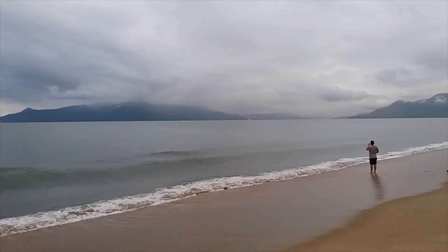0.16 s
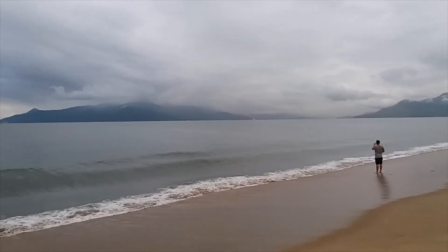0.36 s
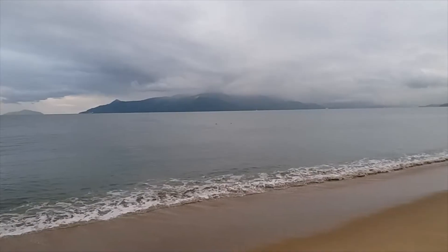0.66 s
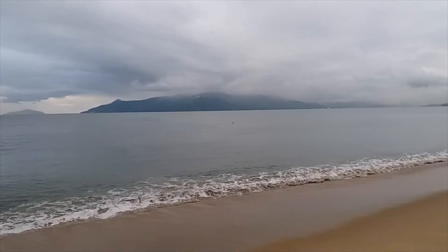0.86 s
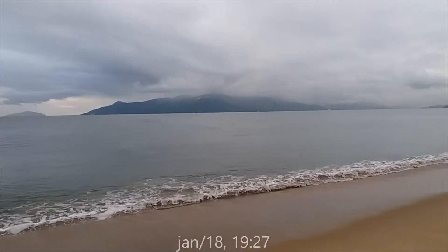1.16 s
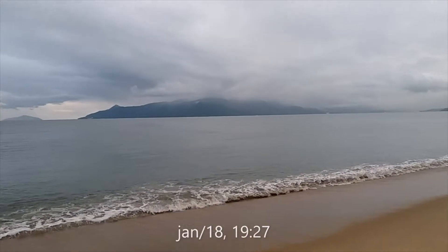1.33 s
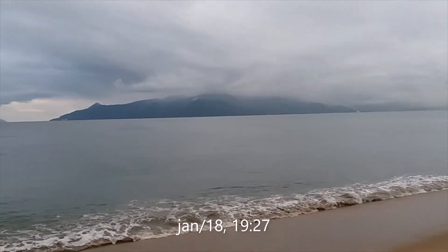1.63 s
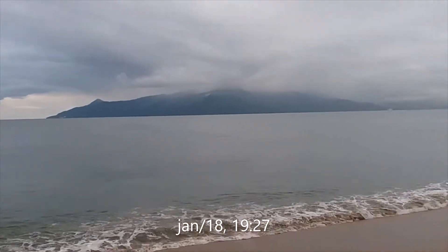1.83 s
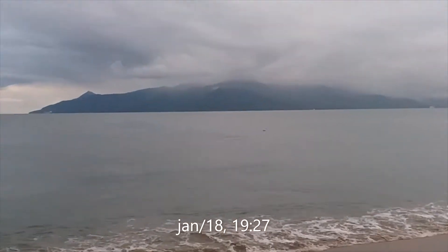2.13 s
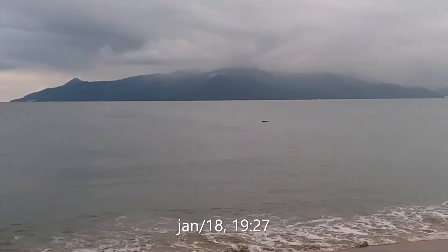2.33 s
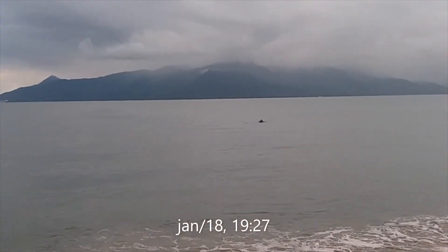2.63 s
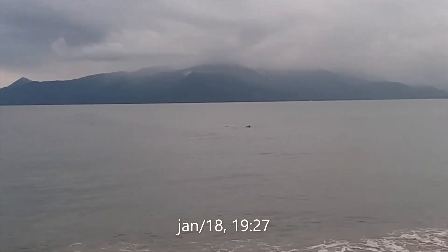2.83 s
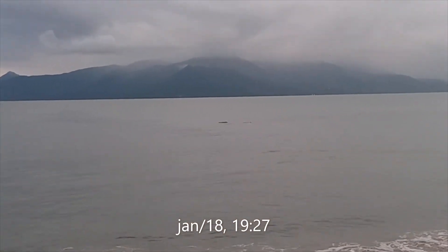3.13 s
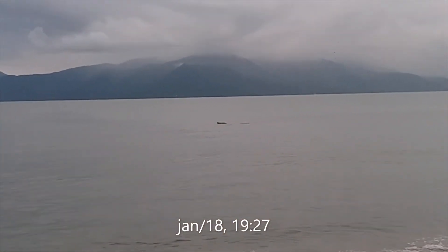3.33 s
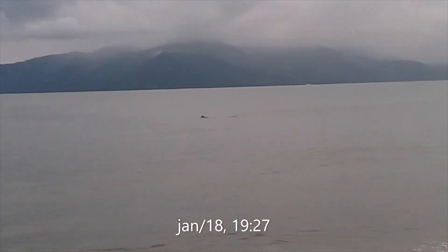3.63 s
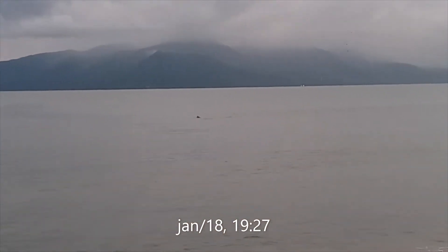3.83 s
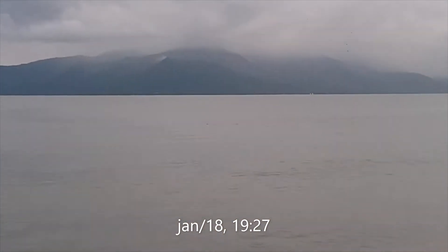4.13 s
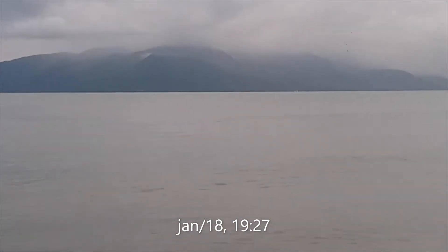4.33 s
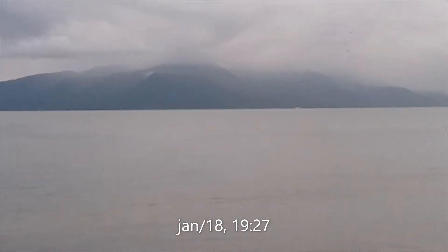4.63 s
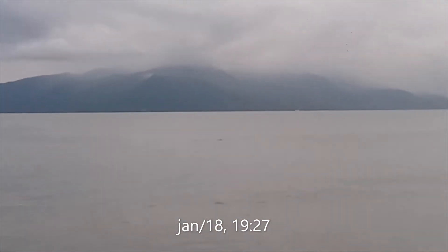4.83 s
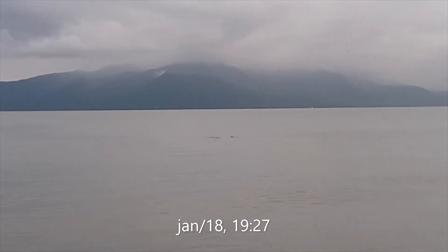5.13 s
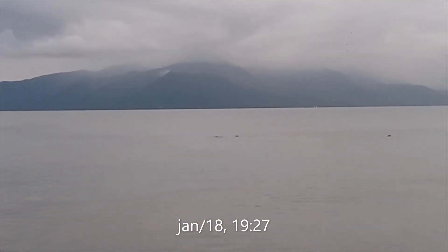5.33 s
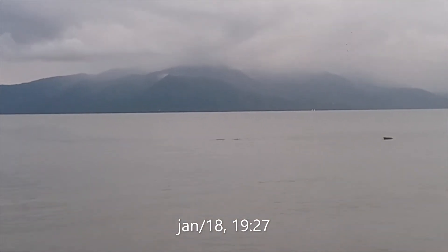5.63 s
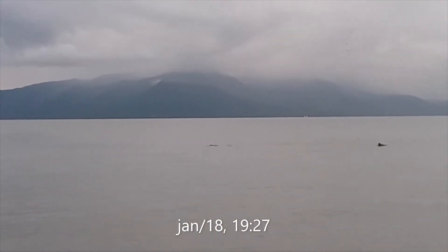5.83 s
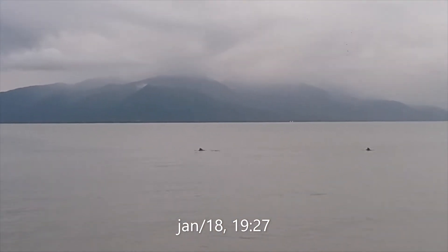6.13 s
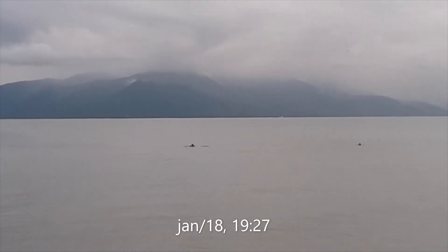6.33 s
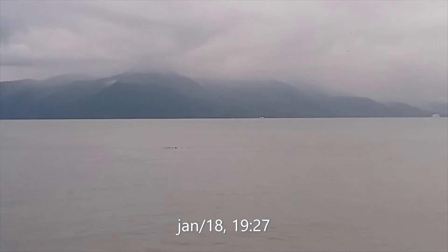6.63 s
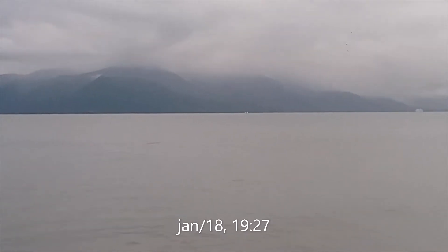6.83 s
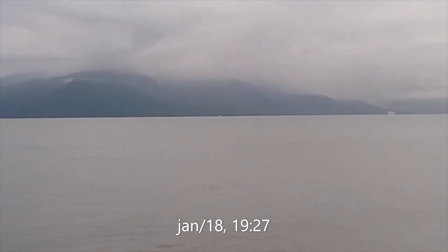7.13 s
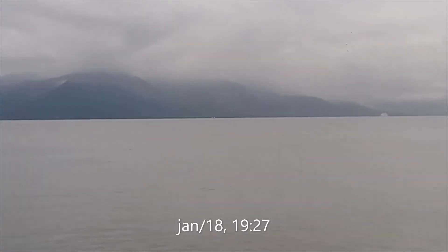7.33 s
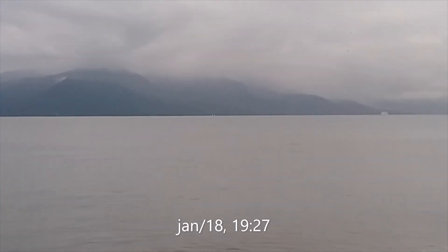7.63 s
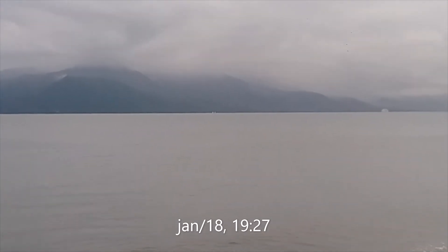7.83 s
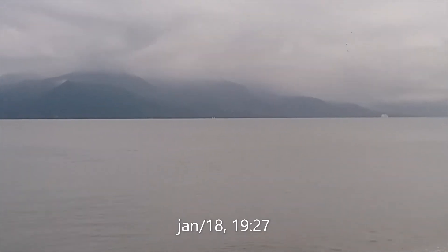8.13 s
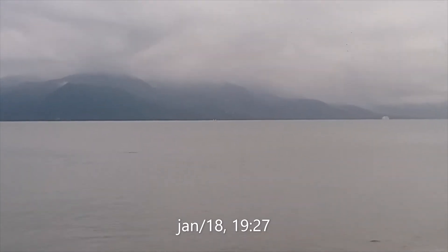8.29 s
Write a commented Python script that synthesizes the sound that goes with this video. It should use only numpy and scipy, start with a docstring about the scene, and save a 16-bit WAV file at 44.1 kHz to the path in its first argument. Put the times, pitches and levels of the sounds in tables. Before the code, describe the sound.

A hydrophone in shallow coastal water picks up dolphins echolocating: short woody, resonant clicks, first in close pairs and dull runs, then in brighter trains that quicken and slacken. More distant animals blur into a pitched crackle. A steady mid-high hiss lies underneath, with low flowing rumble and sloshing surges, scattered sharp shrimp snaps, a few bubbles, soft thuds, and a heavy double knock late on.

```python
"""Dolphins echolocate in shallow coastal water, heard through a hydrophone.
Their clicks are resonant pulses: pairs, a bright train that quickens and slackens, dull runs farther off and
a distant crackle. Shrimp snaps are broader pulses; two short buzzes, apart from the dolphins, are fast pulses.
Bubbles, knocks with their upper body and a faint tone in a buzz are damped rings.
Filtered noise makes the water's flow, rumble, sloshing and nearly steady hiss; a faint whine is two sines."""
import sys
import numpy as np
from scipy import signal
from scipy.fft import rfft, irfft, next_fast_len
from scipy.io import wavfile
from scipy.ndimage import uniform_filter1d

SR = 44100
rng = np.random.default_rng(int(sys.argv[2]) if len(sys.argv) > 2 else 0)


def inscribe(sig):
    """Save sig as 16-bit PCM at rate SR to the path in sys.argv[1].

    A 1-D sig is mono; a 2-D sig holds one channel per row.
    Samples are clipped to [-1, 1] before scaling.
    """
    pcm = np.round(np.clip(np.atleast_2d(sig).T, -1, 1) * 32767)
    wavfile.write(sys.argv[1], SR, pcm.astype(np.int16))


N = 373086
TIME = np.arange(N) / SR  # s

# colour of sloshing water and of the splash at a knock: freq_hz, density_db (relative, per Hz)
SLOSH_COLOUR = [(150, -11), (300, -3.5), (430, -0.5), (650, 3), (1000, -3), (1400, -5), (2500, -17)]


def from_db(db):
    """Decibels to amplitude gain."""
    return 10 ** (np.asarray(db) / 20)


def rms_one(x):
    """Scale to rms 1."""
    return x / np.sqrt(np.mean(x ** 2) + 1e-20)


def gain_at(colour, hz):
    """Gain of a colour, interpolated in dB over log frequency; it falls away beyond both ends."""
    points_hz, level_db = np.transpose(colour)
    hz = np.maximum(hz, 1)
    low_end = np.minimum(hz / points_hz[0], 1)
    high_end = np.minimum(points_hz[-1] / hz, 1) ** 2
    return low_end * high_end * from_db(np.interp(np.log(hz), np.log(points_hz), level_db))


def coloured_noise(colour):
    """White noise shaped by a colour; rms 1."""
    size = next_fast_len(N)
    spectrum = rfft(rng.standard_normal(N), size)
    return rms_one(irfft(spectrum * gain_at(colour, np.fft.rfftfreq(size, 1 / SR)), size)[:N])


def drift(rate_hz):
    """Random values joined by straight lines, rate_hz of them per second; rms 1."""
    steps = rng.standard_normal(4000)
    return rms_one(np.interp(TIME * rate_hz, np.arange(len(steps)), steps))


def add(out, start, sound):
    """Mix a sound in at a sample position."""
    first, last = max(start, 0), min(start + len(sound), N)
    if last > first:
        out[first:last] += sound[first - start:last - start]


def pulse(colour, stretch, lag_s, size):
    """Spectrum of a unit-energy click; its resonances lag the weakest frequencies by up to lag_s."""
    hz = np.fft.rfftfreq(size, 1 / SR)
    gain = gain_at(colour, hz * stretch)
    delay_s = lag_s * (np.sqrt(gain / gain.max()) - 1)
    phase = -2 * np.pi * np.cumsum(delay_s) * hz[1]  # group delay integrated over frequency
    return gain * np.exp(1j * phase) / np.linalg.norm(irfft(gain))


def clicks(rows, colour, vary, lag_s, echo_s, size=1024):
    """Pulses of random pitch and phase, each with three weak inverted echoes from surface and bed."""
    echo_db = -16
    out, hz = np.zeros(N), np.fft.rfftfreq(size, 1 / SR)
    treble = np.interp(hz, [1900, 2400], [0, 1])
    draws = rng.uniform(-0.99, 1, (len(rows), 5))  # pitch, phase, three echo delays
    for (start_s, level_db, *treble_db), draw in zip(rows, draws):
        direct = pulse(colour, np.exp(vary * draw[0]), lag_s, size)
        direct = direct * from_db(level_db + sum(treble_db) * treble)
        delays_s = echo_s * np.exp(draw[2:])
        echoes = np.exp(-2j * np.pi * np.outer(delays_s, hz)).sum(axis=0)
        paths = 1 - from_db(echo_db) * echoes
        click = np.fft.fftshift(irfft(direct * paths * np.exp(1j * np.pi * draw[1])))
        add(out, round(start_s * SR) - size // 2, click * signal.windows.tukey(size))
    return out


def rings(rows, glide):
    """Damped oscillations that swell and die away; pitch slides by a share per swell time, up to ten."""
    out, t = np.zeros(N), TIME[:SR // 4]
    for start_s, peak_db, pitch_hz, swell_s in rows:
        age = t / swell_s
        phase = 2 * np.pi * np.cumsum(pitch_hz * (1 + glide * np.minimum(age, 10))) / SR
        envelope = age ** 2 * np.exp(2 * (1 - age))  # peaks at 1 after swell_s
        add(out, round(start_s * SR), from_db(peak_db) * envelope * np.sin(phase))
    return out


def water():
    """Lumpy flow, rumble and sloshing noises follow the sea and its surges; the hiss only flickers."""
    # slow levels before offsets, surges and lumps: time_s, flow_db, rumble_db, slosh_db
    sea = [(0.0, -52, -39, -38), (0.16, -63.5, -53.5, -50), (1.27, -59, -54, -52.5),
           (1.43, -64, -58, -55.5), (2.02, -58, -50.5, -53.5), (2.19, -56.5, -50, -51),
           (2.47, -70, -54.5, -54), (2.94, -71, -47.5, -57), (3.46, -62, -51.5, -49),
           (4.41, -63.5, -48.5, -55), (5.2, -60, -54.5, -57.5), (6.1, -69, -54, -54), (6.69, -64, -53, -57),
           (6.9, -60, -45, -52.5), (7.61, -69, -53.5, -57), (8.32, -53, -41.5, -49.5),
           (8.46, -54, -36, -46.5)]
    # surges past the hydrophone: crest_s, half_width_s (to 1/e of the lift), lift_db (full on the flow)
    surges = [(.06, .04, 2.5), (.39, 0.063, 5.5), (1.14, 0.062, 13.5), (1.35, 0.022, 5), (1.66, 0.11, 3.5),
              (2.31, 0.045, 5.5), (6.88, 0.086, 0), (7.93, 0.099, 6.5), (8.43, 0.08, 4.5)]
    # noise colours: freq_hz, density_db (relative, per Hz)
    flow_colour = [(20, -25), (45, -14.5), (70, -3.5), (105, -4.5), (135, -2), (200, -29)]
    rumble_colour = [(80, -19.5), (120, -4), (165, 0), (230, -8.5), (350, -21.5), (700, -59.5)]
    hiss_colour = [(900, -23.5), (1350, -10), (1700, 4.5), (2100, 5), (2600, 2.5), (3100, -5),
                   (3800, -15.5), (5000, -26.5), (6800, -27), (7800, -37.5), (9500, -39.5), (11200, -41),
                   (13000, -29), (16000, -31.5)]
    rumble_share, slosh_share = 0.81, 0.78  # of a surge's lift in dB
    flow_lumps_db, rumble_lumps_db, slosh_lumps_db = 3, 2.8, 3.7  # rms
    hiss_db, hiss_flicker_db = -47.5, 1.6

    time_s, *columns = np.transpose(sea)
    flow_db, rumble_db, slosh_db = [np.interp(TIME, time_s, column) for column in columns]
    surge_db = sum(lift_db * np.exp(-((TIME - crest_s) / half_width_s) ** 2)
                   for crest_s, half_width_s, lift_db in surges)
    flow_gain = from_db(flow_db + surge_db + 7.5 + flow_lumps_db * drift(17))
    rumble_gain = from_db(rumble_db + rumble_share * surge_db + 0.8 + rumble_lumps_db * drift(16))
    slosh_gain = from_db(slosh_db + slosh_share * surge_db - 2.0 + slosh_lumps_db * drift(90))
    hiss_gain = from_db(hiss_db + hiss_flicker_db * drift(120))

    flow = flow_gain * coloured_noise(flow_colour)
    rumble = rumble_gain * coloured_noise(rumble_colour)
    slosh = slosh_gain * coloured_noise(SLOSH_COLOUR)
    hiss = hiss_gain * coloured_noise(hiss_colour)
    return flow + rumble + slosh + hiss


def whine():
    """Faint electrical whine: steady sines."""
    # sines: pitch_hz, rms_db
    tones = [(7295, -97.5), (14590, -97.5)]
    return sum(from_db(rms_db) * np.sqrt(2) * np.sin(2 * np.pi * pitch_hz * TIME)
               for pitch_hz, rms_db in tones)


def pod_swell():
    """Rise and fall of the farther pod as it moves, in dB around its mean."""
    # pod level, only its shape is used: time_s, level_db
    pod_levels = [(0.0, -39), (1.08, -39.5), (1.43, -40.5), (4.03, -38.5), (5.02, -43.5), (6.17, -38),
                  (6.93, -44), (7.37, -41.5), (8.46, -41.5)]
    level_db = np.interp(TIME, *np.transpose(pod_levels))
    return level_db - level_db.mean()


def far_pod(level_db, per_s, spread_db, width_s, size=512):
    """Distance smears clicks into short pitched blips; several animals merge into a crackle."""
    # voices of the distant animals: pitch_hz, level_db (relative)
    voices = [(1660, -5.5), (1740, 2), (1830, 1.5), (1970, 2.5), (2250, -2), (2420, 1), (2560, -9),
              (2720, -12.5), (2950, -3.5)]
    out, t = 0, (np.arange(size) - size // 2) / SR
    sizes = from_db(-spread_db * rng.random(N))
    signs = rng.choice([-1, 1], N)
    struck = rng.random(N) < per_s / SR
    impulses = sizes * signs * struck
    caller = rng.integers(0, len(voices), N)
    for k, (pitch_hz, voice_db) in enumerate(voices):
        blip = from_db(voice_db) * np.cos(2 * np.pi * pitch_hz * t) / np.cosh(t / width_s)
        out = out + signal.fftconvolve(impulses * (caller == k), blip, "same")
    return from_db(level_db + pod_swell()) * rms_one(out)


def pod_trains(level_db, count):
    """Animals click without pause at wandering pace; level swings as heads turn: rows start_s, level_db."""
    gap_s, wander, swing_db = .065, .2, 1.6  # usual gap, spread of the log rate, rms swing
    rows = []
    for _ in range(count):
        rate_per_s = np.exp(wander * drift(1.5)) / gap_s
        sent = rng.random() + np.cumsum(rate_per_s) / SR
        at = np.flatnonzero(np.diff(np.floor(sent)))  # a click at each whole count
        levels_db = level_db + pod_swell() + swing_db * drift(3.045)
        rows += zip(TIME[at], levels_db[at])
    return rows


def train(runs):
    """Within a run the click gap changes evenly; levels vary by 1 dB rms: rows start_s, level_db."""
    rows = []
    for first_s, last_s, count, gap_ratio, level_db in runs:
        steps = np.cumsum([0, *np.linspace(1, gap_ratio, round(count) - 1)])
        starts_s = first_s + (last_s - first_s) * steps / steps[-1]
        rows += [(start_s, level_db) for start_s in starts_s]
    chances_db = rng.standard_normal(len(rows))
    return [(start_s, level_db + chance_db) for (start_s, level_db), chance_db in zip(rows, chances_db)]


def dolphins():
    """Resonant click pairs, and bright and dull trains, with weaker trains behind them."""
    # All level_db here are relative, before each kind's gain below.
    # pairs of the nearest dolphin, mostly duller when it turns away: start_s, gap_s, level_db, treble_db
    pair_rows = [(.6111, .034, -20, -2.5), (.7982, .0322, -20, -1.5), (.9714, .0323, -21, -1),
                 (1.1551, .034, -21, -2), (1.719, .0335, -28.5, -7), (1.885, .0335, -28.5, -8),
                 (2.0459, .0358, -30, -7), (2.2285, .0306, -27, -7), (3.1751, .0335, -22.5, 2),
                 (3.3576, .032, -23, 1.5), (3.5308, .0317, -22, 1), (3.7252, .0318, -22, .5),
                 (3.9541, .0313, -28, -10), (4.6359, .0327, -30, -7), (4.7977, .0317, -27.5, -7),
                 (4.9575, .0313, -27, -5), (5.1168, .0303, -27.5, -7), (5.2845, .0313, -28, -7),
                 (5.4768, .0327, -28, -7), (5.735, .0314, -28, -4)]
    # runs with the beam at the hydrophone: first_s, last_s, clicks, last_gap/first_gap, level_db
    bright_runs = [(.7901, 1.2297, 4, 1.03, -29), (2.612, 2.8769, 3, .87, -26.5),
                   (2.9883, 3.3455, 5, .77, -28.5), (3.4205, 3.737, 6, .87, -27.5),
                   (3.8069, 4.2395, 9, .81, -27), (4.2914, 4.7278, 10, 1.02, -29.5),
                   (4.7787, 5.0526, 5, 1.44, -29.5), (5.1346, 5.5153, 6, .82, -29.5),
                   (5.5846, 6.0318, 8, .91, -26.5), (6.0943, 6.3337, 5, .8, -26),
                   (6.3858, 6.5525, 4, 1.16, -25.5), (6.6252, 7.2362, 10, .76, -26),
                   (7.3006, 7.83, 10, .79, -26), (7.8871, 8.417, 11, .97, -26.5)]
    # runs of dolphins facing away: first_s, last_s, clicks, last_gap/first_gap, level_db
    dull_runs = [(.0694, .3417, 4, .88, -24), (.4211, .6297, 4, .87, -26), (.6912, .9603, 6, .87, -26),
                 (1.1629, 1.4803, 5, 0.77, -27.5), (1.5419, 1.8655, 7, 0.84, -25.5),
                 (1.9591, 2.0724, 3, .78, -26.5), (2.1829, 2.3344, 4, 1.01, -29.5),
                 (2.4631, 2.577, 3, 1.27, -29), (2.6351, 2.9171, 5, 0.91, -30),
                 (2.9929, 3.3167, 6, 0.94, -32), (3.6836, 3.8385, 3, .82, -27.5),
                 (4.1493, 4.2779, 3, 1.23, -30.5), (4.6089, 4.8448, 3, .77, -29),
                 (4.9414, 5.2509, 4, 0.92, -28.5), (5.346, 5.7061, 5, .72, -28),
                 (5.783, 5.9852, 4, 0.84, -27), (6.0439, 6.3104, 6, 0.91, -26.5),
                 (6.7552, 6.965, 3, 0.82, -25.5), (7.058, 7.233, 3, 1.06, -24.5),
                 (7.3161, 7.6593, 6, 0.83, -29), (7.718, 8.023, 7, .88, -33)]
    # click colours: freq_hz, level_db
    paired_colour = [(120, -28.5), (330, -14), (750, -7), (1200, -16), (1700, 4.5), (1900, -2),
                     (2180, -12.5), (2650, 4.5), (2950, 0.5), (3350, -23.5), (5000, -31.5), (7500, -55.5)]
    bright_colour = [(300, -15.5), (1200, -48), (1700, 7), (2000, -23.5), (2300, 10), (2550, 8),
                     (3000, -13), (3700, -18.5), (4500, -26), (6600, -27), (7400, -54.5)]
    dull_colour = [(300, -35.5), (800, -25), (1250, -31.5), (1600, -5), (1780, 3), (2150, -11.5),
                   (2450, -9.5), (2850, -26.5), (3400, -21), (4500, -67.5), (6500, -97.5), (7500, -79.5)]
    pod_dull_db, pod_bright_db, pod_low_db = -33, -38, -39  # weaker trains

    pairs = [(start_s + late_s, level_db, treble_db)
             for start_s, gap_s, level_db, treble_db in pair_rows for late_s in (0, gap_s)]
    low = pairs + pod_trains(pod_low_db, count=1)
    paired = from_db(19.5) * clicks(low, paired_colour, vary=0.012, lag_s=0.001755, echo_s=0.000808)

    facing = train(bright_runs) + pod_trains(pod_bright_db, count=2)
    bright = from_db(17.3) * clicks(facing, bright_colour, vary=0.025, lag_s=0.0018, echo_s=0.0007)

    turned = train(dull_runs) + pod_trains(pod_dull_db, count=2)
    dull = from_db(16.8) * clicks(turned, dull_colour, vary=0.04, lag_s=0.0018, echo_s=0.0009)
    return paired + bright + dull


def knocks():
    """Low thuds at the hydrophone, each with an overtone and a little splash; deep bass is cut."""
    # fundamentals before the bass cut: start_s, peak_db, pitch_hz, swell_s
    thud_rows = [(.024, -28, 140, 0.017), (1.106, -27, 157, 0.0039), (1.189, -36, 151, 0.0052),
                 (1.627, -31, 131, 0.01), (1.916, -29, 132, 0.0035), (2.279, -31, 110, 0.011),
                 (2.333, -28.5, 97.5, 0.0057), (4.27, -30, 153, 0.023), (5.459, -28.5, 149, 0.0048),
                 (6.095, -32.5, 158, 0.0081), (6.322, -32, 120, 0.0057), (6.743, -30.5, 135, 0.019),
                 (6.795, -9, 112, 0.0034), (6.808, -18, 160, 0.0038), (6.8193, -5.5, 157, 0.0049),
                 (6.834, -15.5, 125, 0.0077), (8.419, -17, 153, 0.0031), (8.45, -17.5, 191, 0.0046)]
    pitch_ratio, overtone_db, swell_ratio = 2.3, -20, 0.88  # overtone against fundamental
    overtones = [(start_s, peak_db + overtone_db, pitch_hz * pitch_ratio, swell_s * swell_ratio)
                 for start_s, peak_db, pitch_hz, swell_s in thud_rows]
    bass_cut = signal.butter(3, 72, "high", fs=SR, output="sos")
    thuds = signal.sosfilt(bass_cut, rings([*thud_rows, *overtones], glide=-0.018))
    stir = uniform_filter1d(np.abs(thuds), size=SR // 50)  # 20 ms mean
    return thuds + from_db(-29.0) * stir * coloured_noise(SLOSH_COLOUR)


def short_rings():
    """Damped rings, pitch rising slightly: bubbles, upper body of the big knock, faint tone in a buzz."""
    # a few bubbles; near 5.9 s the buzz's 1 kHz tone, near 6.8 s the big knock's 300-700 Hz body:
    # start_s, peak_db, pitch_hz, swell_s
    ring_rows = [(.040, -41.5, 788, 0.024), (.063, -28, 735, 0.0041), (.081, -28.5, 910, 0.0026),
                 (1.099, -33, 937, 0.0069), (1.112, -37, 1150, 0.0035), (2.280, -26.5, 800, 0.0052),
                 (5.902, -46.5, 1010, 0.014), (6.797, -32, 560, 0.0081), (6.806, -31, 375, .004),
                 (6.820, -30, 640, 0.0028), (6.845, -45.5, 580, 0.022), (6.905, -38, 400, 0.0043),
                 (7.903, -29.5, 570, 0.0014), (7.961, -29.5, 530, 0.0023), (8.124, -38.5, 910, 0.0058),
                 (8.164, -23.5, 2800, 0.0013), (8.222, -40, 840, 0.0041)]
    return rings(ring_rows, glide=0.0046)


def shrimp():
    """Broadband snaps: a few near ones, and fainter ones at random moments."""
    # near snaps: start_s, level_db (relative, before the gain below)
    near_snaps = [(.478, -39.5), (.5391, -38), (1.1614, -46), (1.6496, -40), (1.8806, -32), (2.7147, -48.5),
                  (3.3005, -39.5), (3.459, -42), (3.5998, -30), (4.7009, -40.5), (5.685, -41),
                  (5.9034, -41.5), (6.835, -55), (7.052, -36.5), (7.889, -45), (7.9752, -32.5),
                  (8.394, -42), (8.4196, -33)]
    # broad snap colour: freq_hz, level_db
    snap_colour = [(400, 2.5), (1200, 1.5), (2000, 7), (3000, 7), (4800, -15.5), (6600, -4.5),
                   (8000, -19.5), (9500, -12), (11000, -32), (13500, -14.5), (16000, -28)]
    faint_per_s, loudest_db, spread_db = 2, -47, 4.5  # the others lie up to spread_db lower
    draws = rng.random(size=(1000, 2))[:round(faint_per_s * N / SR)]
    faint = [(when * N / SR, loudest_db - spread_db * depth) for when, depth in draws]
    snaps = clicks([*near_snaps, *faint], snap_colour, vary=0.066, lag_s=0.00056, echo_s=0.00061)
    return from_db(22.5) * snaps


def buzzes():
    """Short electronic-sounding buzzes: evenly spaced pulses in fast succession."""
    # buzzes: start_s, length_s, rate_per_s, level_db (relative, before the gain below)
    buzz_rows = [(1.076, .016, 400, -34.5), (5.905, 0.038, 250, -33.5)]
    # pulse colour: freq_hz, level_db
    buzz_colour = [(300, -31.5), (700, -2), (1250, -17.5), (1700, 2.5), (2100, 4), (2550, 5.5), (3000, 13),
                   (3700, -27), (5000, -41), (6700, -57), (7500, -68)]
    run = [(start_s + k / rate_per_s, level_db) for start_s, length_s, rate_per_s, level_db in buzz_rows
           for k in range(int(length_s * rate_per_s))]
    return from_db(15.0) * clicks(run, buzz_colour, vary=0.16, lag_s=0.00252, echo_s=0.0017)


def shallows(x, t60_s):
    """Rough surface and bed scatter a short tail: unit-energy noise decaying 60 dB in t60_s."""
    t = TIME[:SR // 5]
    tail = rng.standard_normal(len(t)) * from_db(-60 * t / t60_s)
    return signal.fftconvolve(x, tail / np.linalg.norm(tail))[:N]


def scene():
    """Everything heard through the one hydrophone, with the whine."""
    sea, thuds = water(), knocks()
    far = far_pod(level_db=-46.7, per_s=190, spread_db=6.0, width_s=.00045)
    pulses = dolphins() + buzzes() + shrimp()
    scatter = from_db(-19) * shallows(pulses, t60_s=.05)
    boom = from_db(-25.0) * shallows(thuds, t60_s=0.25)
    return (pulses + far + thuds + short_rings() + scatter + boom + sea + whine())[None]


def record(dry):
    """Steep elliptic low-pass cuts the top."""
    cutoff_hz = 15850
    return signal.sosfilt(signal.ellip(10, .1, 80, cutoff_hz, fs=SR, output="sos"), dry)


dry = scene()
out = record(dry)
inscribe(out)
```